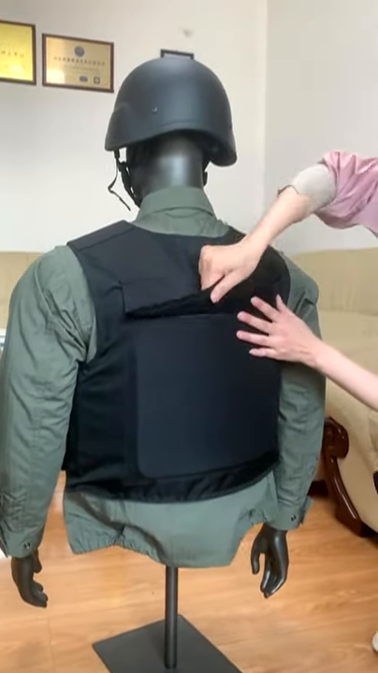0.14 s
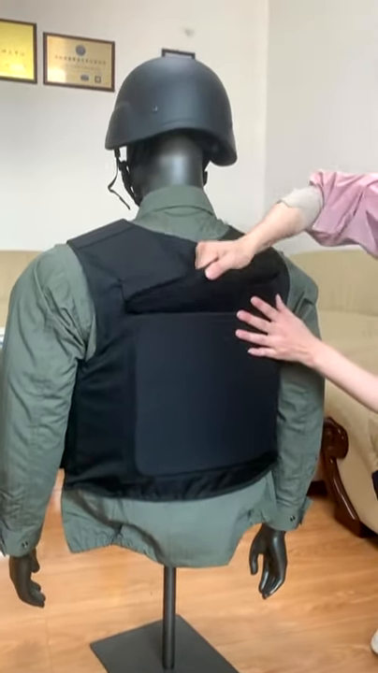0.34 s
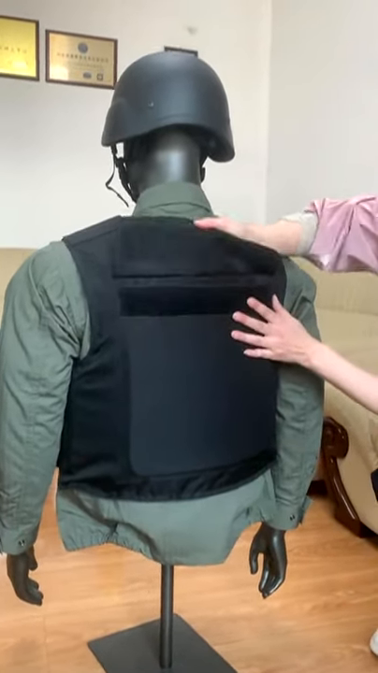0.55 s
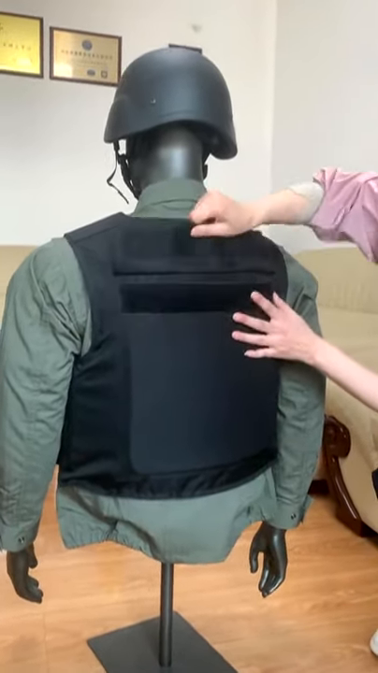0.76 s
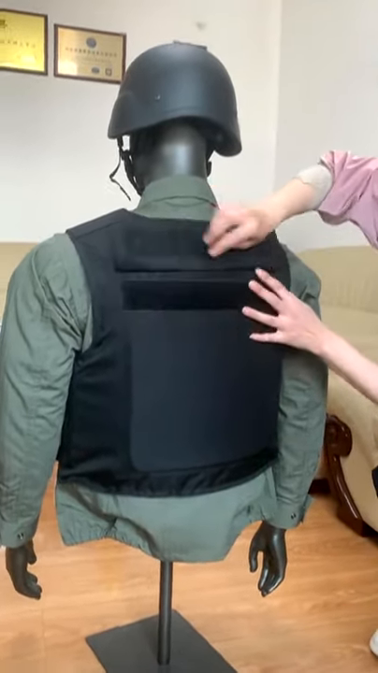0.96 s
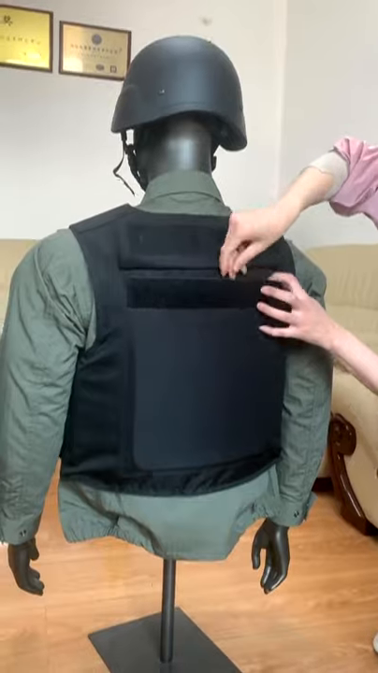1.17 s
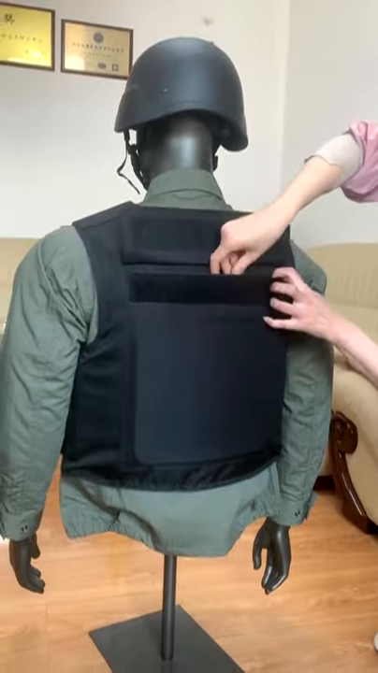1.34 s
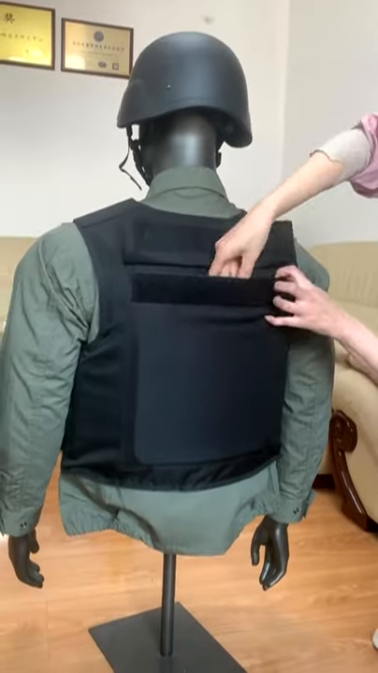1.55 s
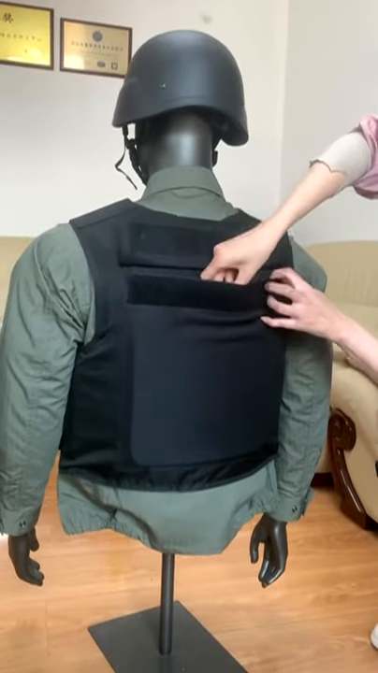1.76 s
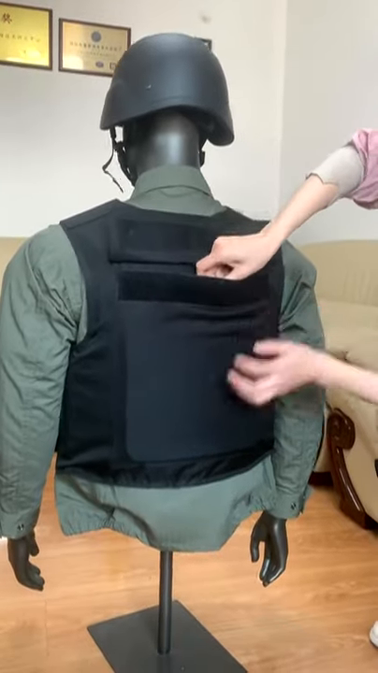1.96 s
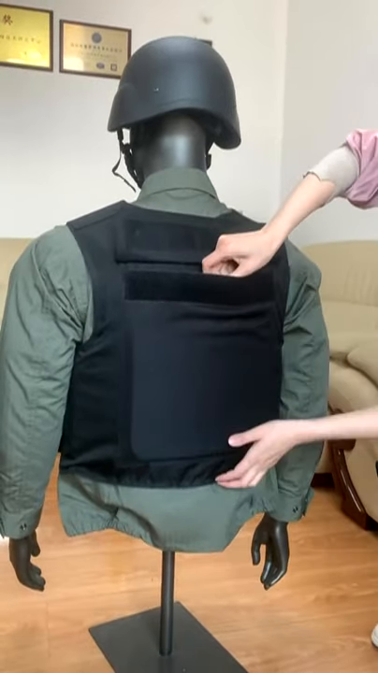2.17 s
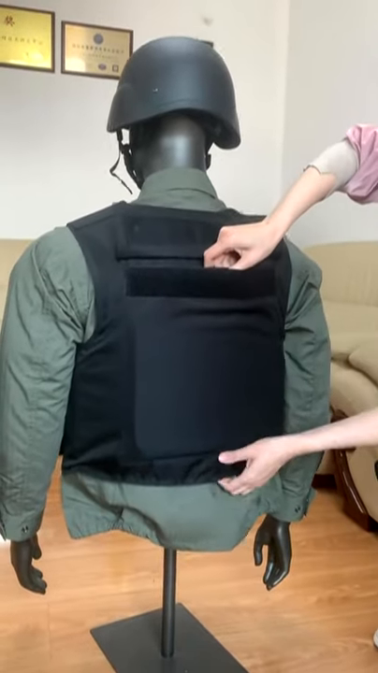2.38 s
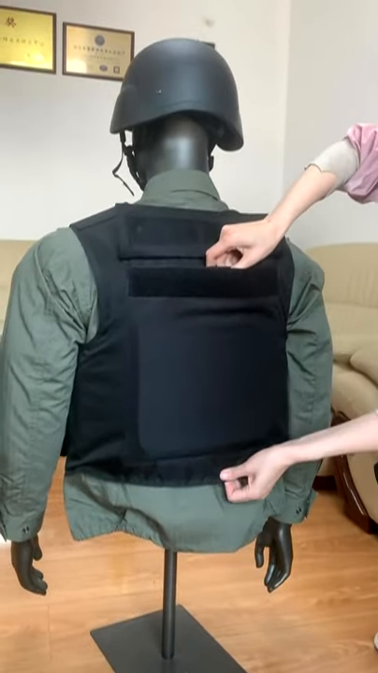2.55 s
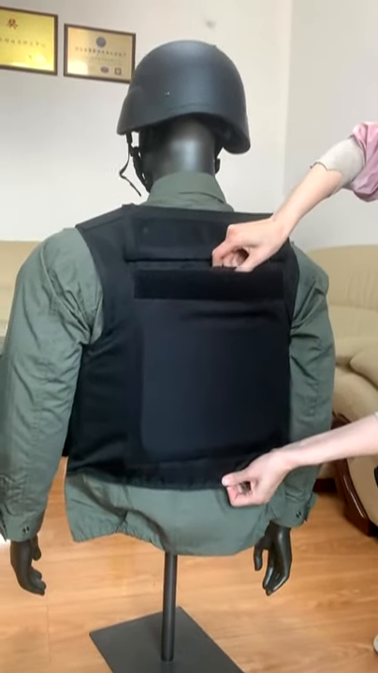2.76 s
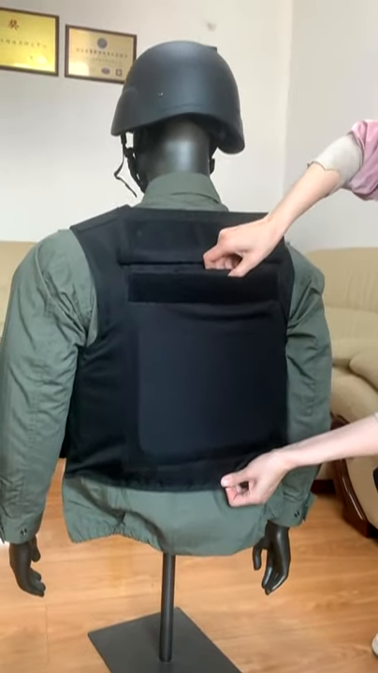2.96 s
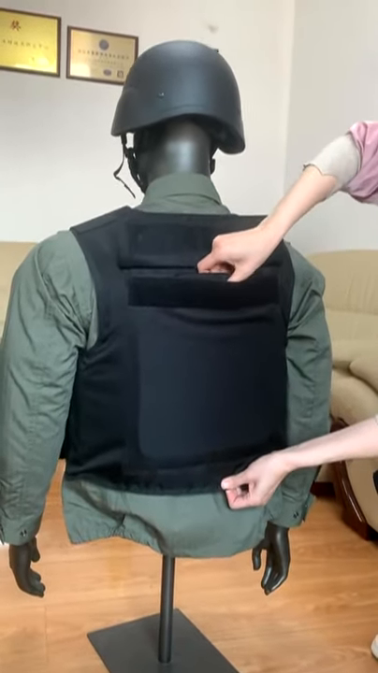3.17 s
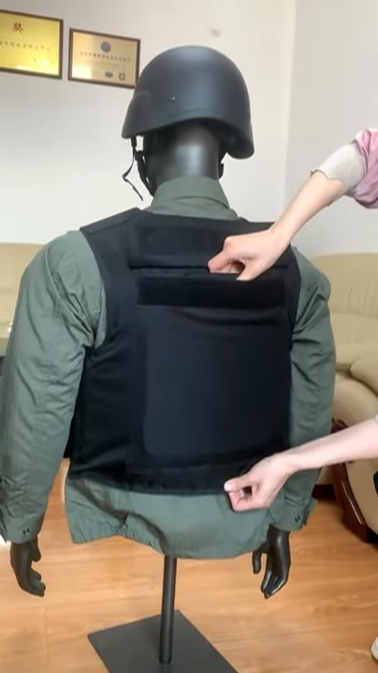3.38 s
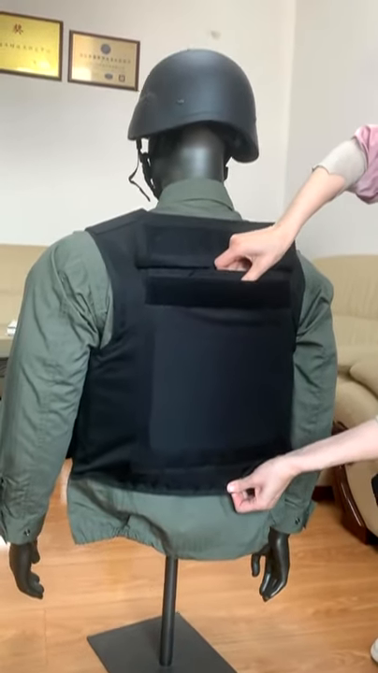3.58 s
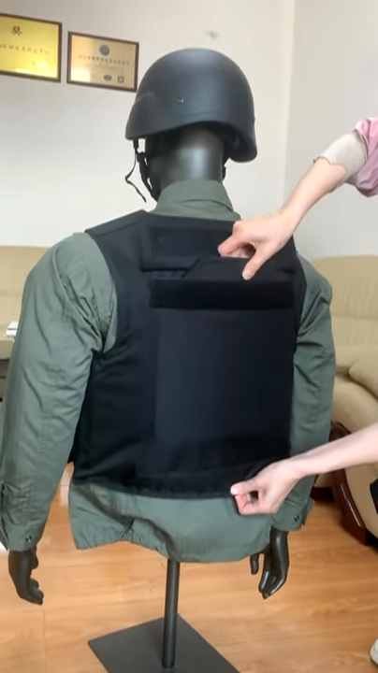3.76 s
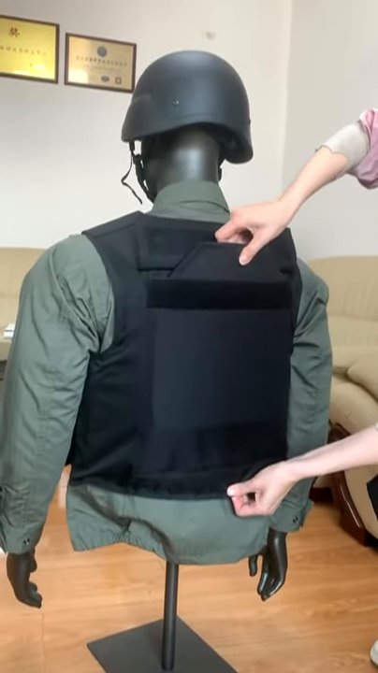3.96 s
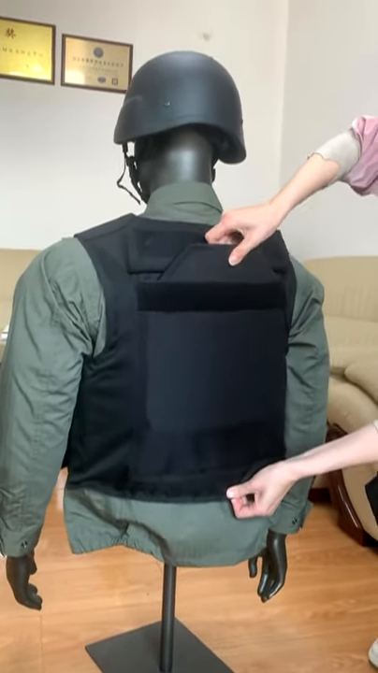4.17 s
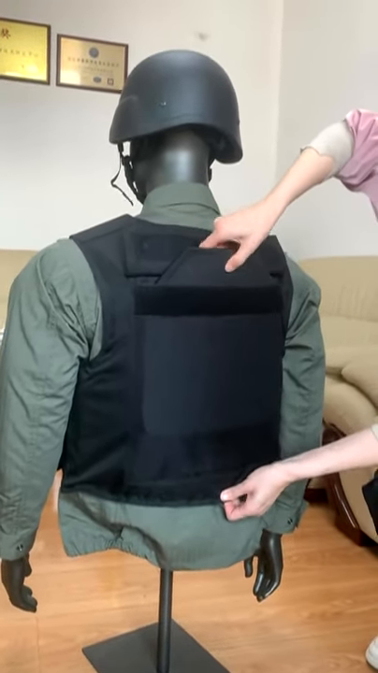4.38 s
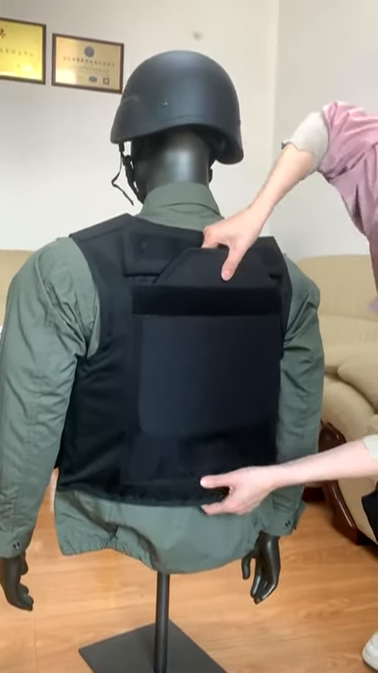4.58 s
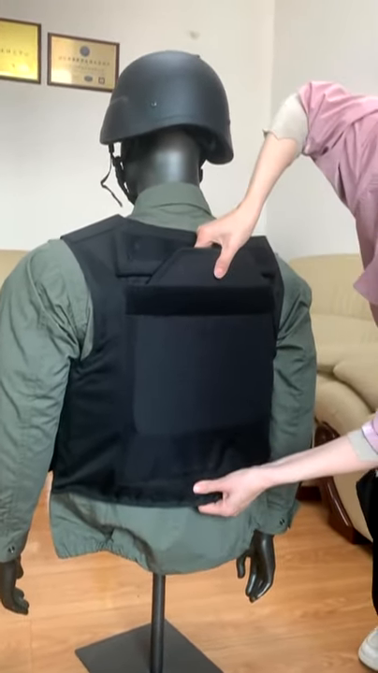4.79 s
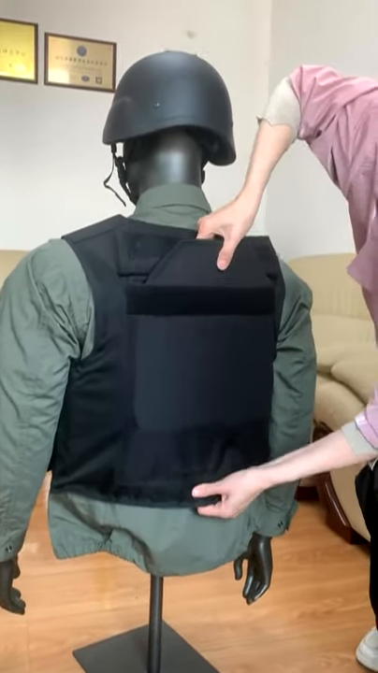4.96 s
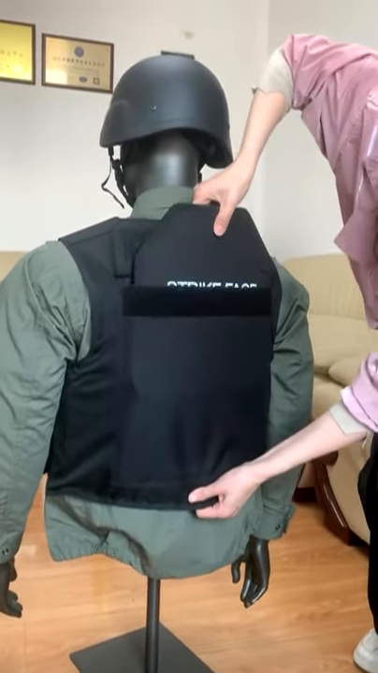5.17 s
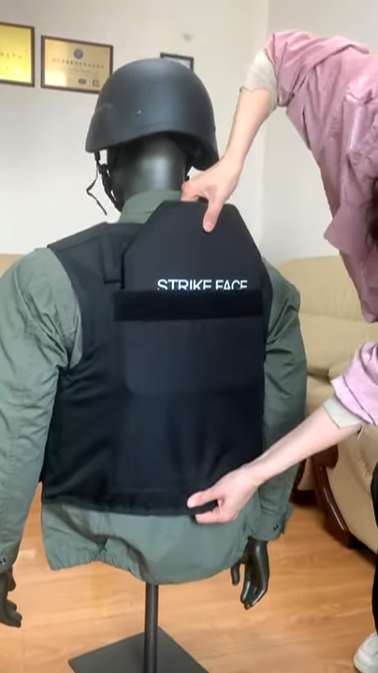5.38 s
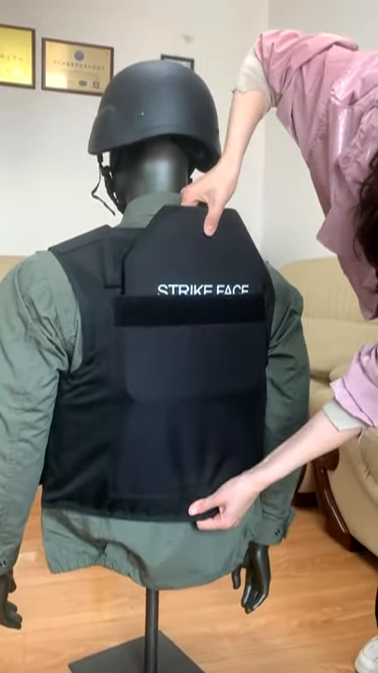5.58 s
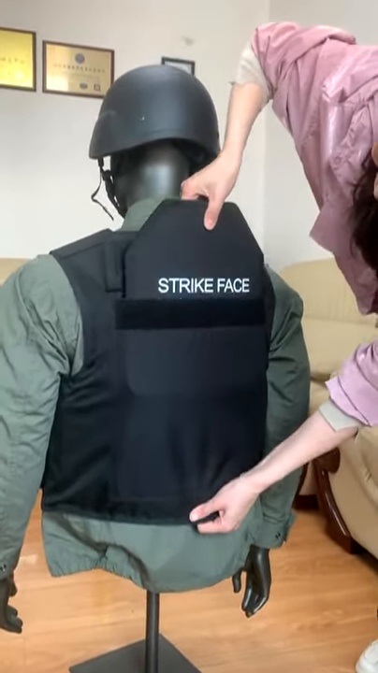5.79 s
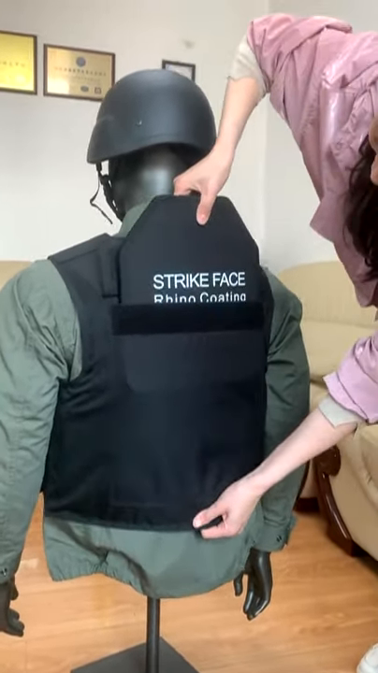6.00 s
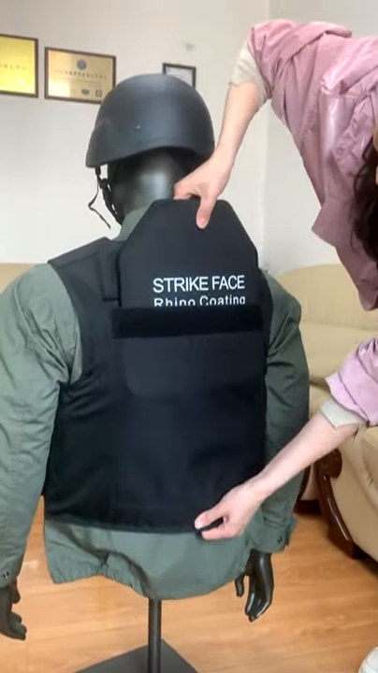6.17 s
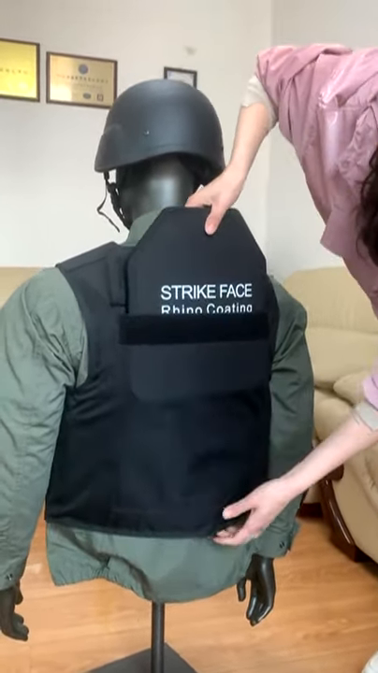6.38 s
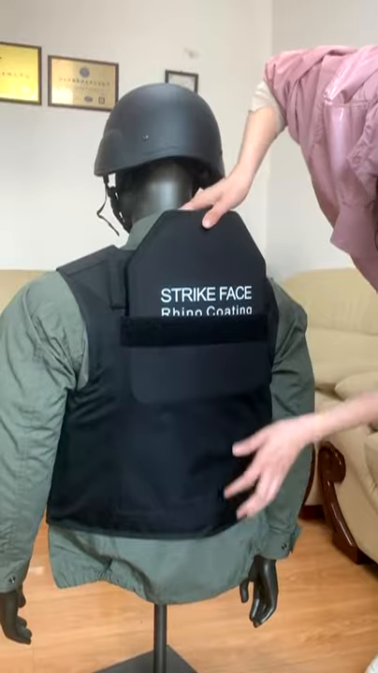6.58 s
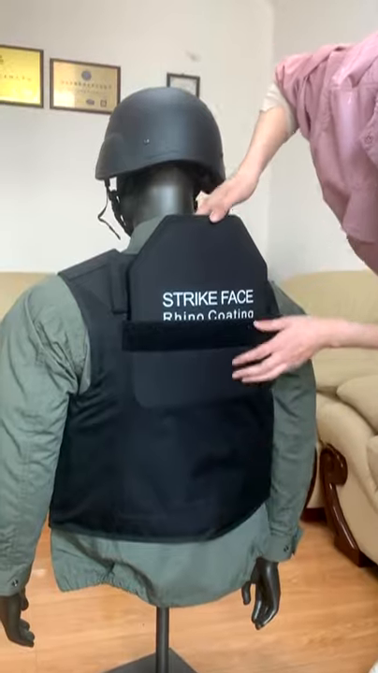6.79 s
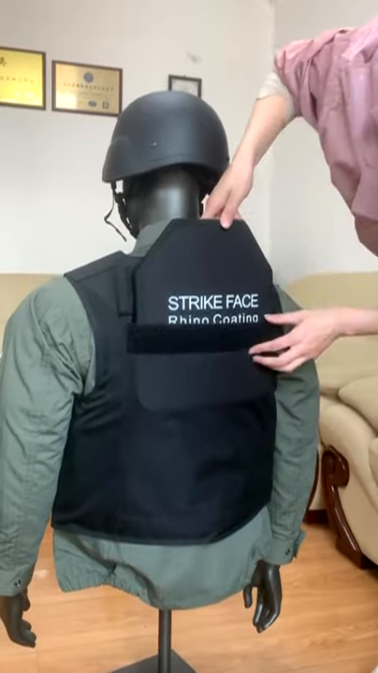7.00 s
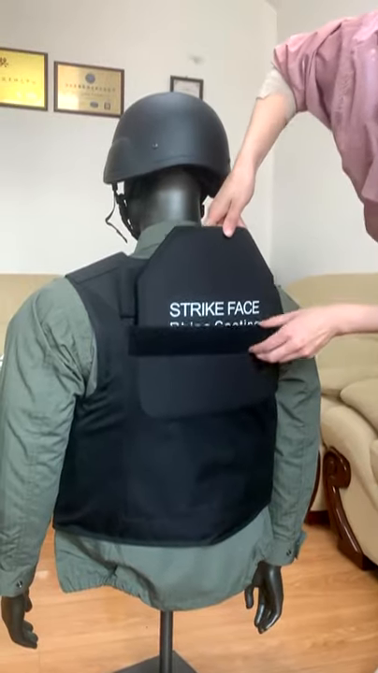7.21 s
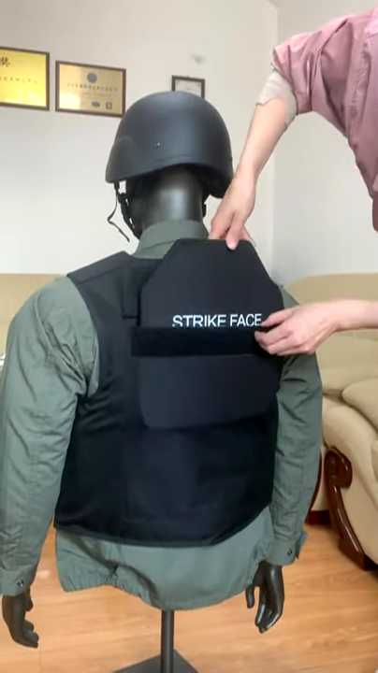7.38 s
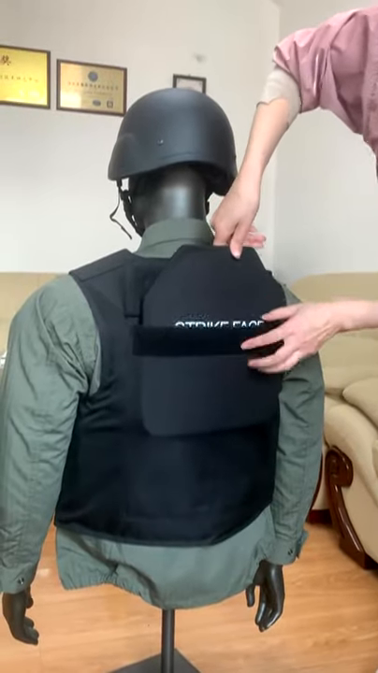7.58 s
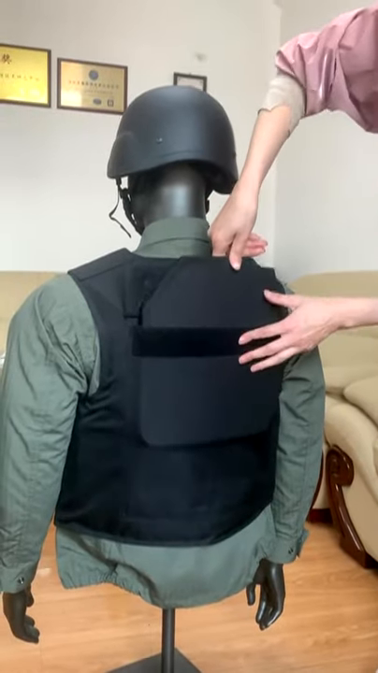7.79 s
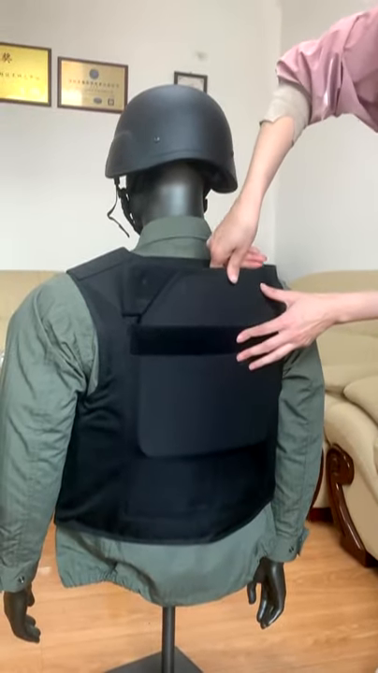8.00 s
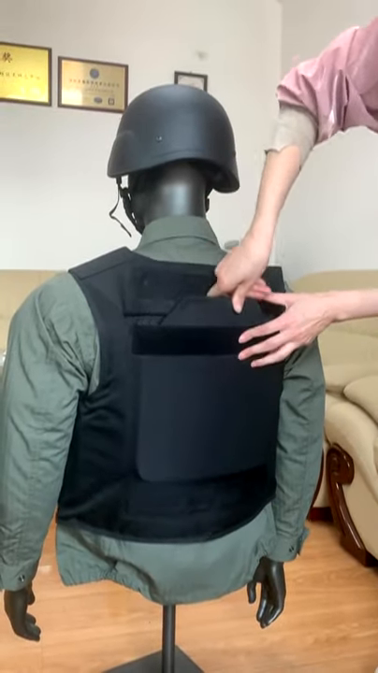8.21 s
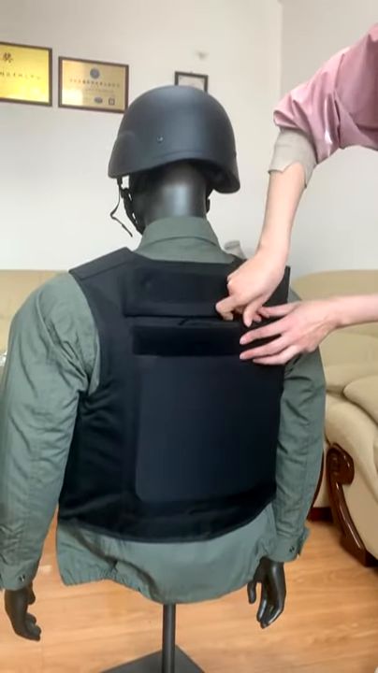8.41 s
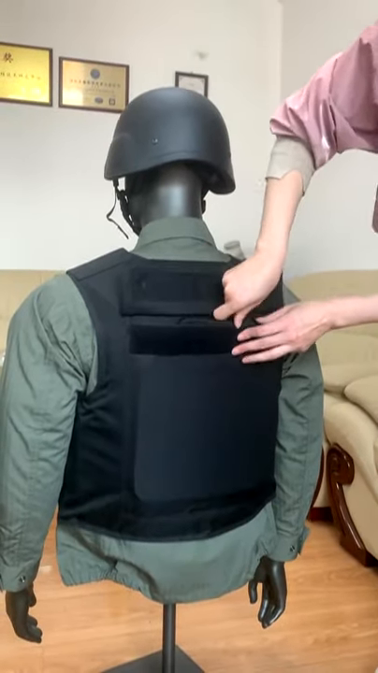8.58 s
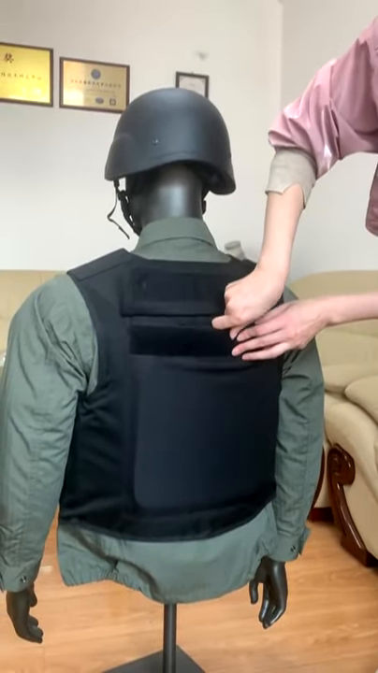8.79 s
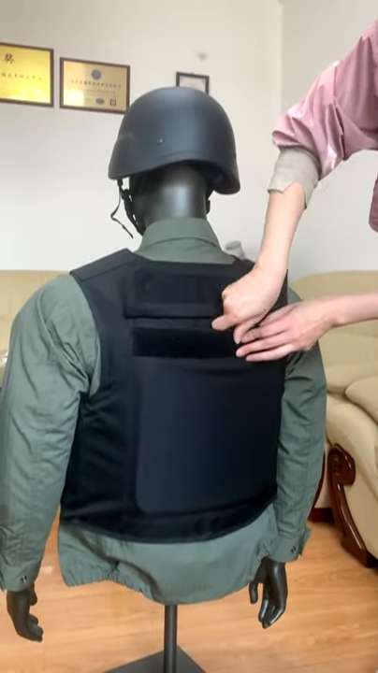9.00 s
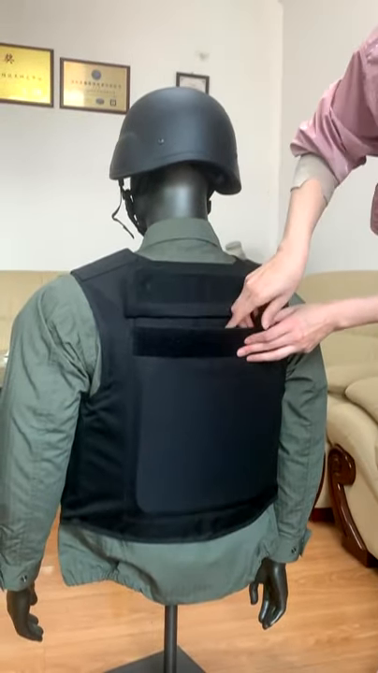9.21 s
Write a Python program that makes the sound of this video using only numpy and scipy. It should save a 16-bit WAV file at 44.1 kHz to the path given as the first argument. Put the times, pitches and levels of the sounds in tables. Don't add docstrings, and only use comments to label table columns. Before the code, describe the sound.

A hook-and-loop flap rips open with a harsh crackling tear, then a hard plate slides and rustles in a nylon pocket indoors.

```python
import sys
import numpy as np
from scipy import signal
from scipy.fft import rfft, irfft, next_fast_len
from scipy.io import wavfile
from scipy.ndimage import uniform_filter1d

SR = 44100
rng = np.random.default_rng(int(sys.argv[2]) if len(sys.argv) > 2 else 0)


def level_to_linear(level):
    exponent = np.asarray(level, float) / 20
    return 10 ** exponent


def waveform_to_disk(signal):
    frames = np.transpose(np.atleast_2d(signal))
    scaled = np.clip(frames, -1, 1) * 32767
    samples = np.round(scaled).astype(np.int16)
    wavfile.write(sys.argv[1], SR, samples)


N = 407925
TIME = np.arange(N) / SR
SIZE = next_fast_len(N + SR)
HZ = np.arange(SIZE // 2 + 1) * SR / SIZE + 1e-3

# time in seconds, level in dB.
TEAR_PULL = [
    (.29, -62),
    (.305, -40.5),
    (.395, -25),
    (.545, -30),
    (.56, -24),
    (.61, -29),
    (.66, -26.5),
    (.706, -26.5),
    (.722, -46.5),
]
# start in seconds, rise in dB, dying time in seconds.
HOOK_SURGES = [(0.307, 6, 0.0076), (.322, 7, 0.0062), (.331, 2, .006), (.344, 8, 0.005), (.358, 3.5, .006),
               (0.376, 5, 0.0067), (.402, 7.5, 0.01), (.413, 4.5, .01), (.432, 7.5, 0.014),
               (.466, 6, 0.024), (.506, 6.5, 0.016), (.552, 8.5, 0.045), (.574, 3.5, 0.022),
               (.632, 4.5, 0.028), (.662, 3.5, 0.028), (.698, 4, 0.0091)]
# time in seconds, level in dB.
FIRST_HOOKS = [(0.3047, -24), (0.3071, -20), (0.3077, -17), (0.3204, -17), (0.3234, -17), (0.3311, -15),
               (0.3389, -17), (0.3424, -15), (0.3814, -10), (0.403, -7), (0.4294, -8)]
# frequency in Hz, density in dB per Hz.
HOOK_SPECTRUM = [(150, -31), (400, -17.5), (600, -17), (1200, -4), (2200, -2.5), (3300, 0), (4200, 2.5),
                 (5000, 1), (9000, -3.5), (12000, -6.5)]
WEAVE_SPECTRUM = [(1200, -10), (2500, -5), (4000, -4.5), (6500, 0.5), (9000, -1), (12000, -4.5)]
FOLD_SPECTRUM = [(120, -7), (300, -2), (500, 0), (1000, -2.5), (1800, -3), (3000, -8.5), (5000, -17.5)]
# peak in seconds, weave hiss in dB, time to rise 20 dB in seconds, time to fall 20 dB in seconds,
# fold rustle in dB above the hiss.
FLAP_STROKES = [(.005, -57.5, 1, 0.8, 4.5), (.21, -42, 0.04, 0.02, -12), (.282, -58, .004, .03, 13),
                (.298, -47, .02, .02, -4), (.86, -52, 0.3, 0.11, 1), (.93, -55, .05, .05, 9),
                (1.0, -63, .1, .3, 9), (1.07, -35.5, .04, .014, -2.5), (1.27, -61.5, .02, 0.1, 11),
                (1.49, -60, 0.23, 0.1, -2), (1.68, -59.5, 0.1, 0.14, 5), (1.76, -67.5, 0.2, 0.65, 5.5),
                (2.03, -60.5, 0.1, 0.3, 2)]
PLATE_STROKES = [(2.31, -56, 0.28, .8, -7.5), (2.39, -60, 0.081, 0.63, 6), (2.98, -53, 0.41, 0.084, -11.5),
                 (3.57, -58, 0.12, .5, -23), (4.01, -42, 0.39, 0.16, -5), (5.09, -51, 0.12, 0.47, -9),
                 (5.35, -38.5, .24, 0.16, -1), (5.945, -51.5, .006, 0.24, -2.5),
                 (6.05, -42.5, 0.12, 0.1, -1.5), (7.47, -45.5, 0.198, .15, -5.5), (7.55, -52, .1, 0.46, 0),
                 (8.08, -48, .7, 0.39, -4), (8.46, -36.5, .3, .13, -5.5), (8.9, -50.5, .04, .25, -3),
                 (9.09, -51.5, .5, .06, -7), (5.2, -47.5, 0.21, 0.28, -10), (7.8, -57, .4, .3, -10)]
GRIP_STROKES = [(2.22, -68, .12, .1, 11), (2.66, -64, 0.36, .1, 6.5), (3.16, -72, 0.12, 0.089, 10),
                (3.26, -67.5, .15, 0.17, 4), (3.34, -57, .09, 0.096, 1.5), (4.3, -65, .08, .15, -3),
                (4.46, -60.5, 0.028, .14, 5.5), (4.65, -62, .18, .15, 6.5), (4.69, -66.5, 0.037, .1, 17),
                (4.74, -56.5, 0.094, 0.11, 4.5), (4.88, -65, .25, .4, 11), (5.55, -68, .1, 0.23, 10),
                (5.76, -72, .2, .15, 6.5), (6.15, -62.5, .05, 0.17, 6), (6.37, -65.5, .05, 0.35, 3.5),
                (6.49, -63, 0.21, 0.11, 4.5), (6.93, -64, .3, 0.11, 3.5), (7.05, -58.5, .09, .13, -8),
                (7.24, -61.5, 0.15, 0.53, 8.5), (8.6, -61, .1, .2, 4), (9.22, -69, .1, .3, -9)]
# time in seconds, pitch in Hz, level in dB.
POCKET_TONES = [
    [(.68, 91.5, -57), (.73, 79.6, -43.5), (.8, 75, -62)],
    [(3.97, 165, -71), (4.02, 151, -51), (4.07, 135, -66)],
    [(5.2, 95, -61), (5.27, 100.8, -52), (5.36, 109, -58)],
    [(6.0, 139.6, -57), (6.07, 159, -47), (6.15, 166, -61)],
    [(8.28, 69.7, -55), (8.33, 85.2, -52), (8.38, 161.5, -61), (8.43, 231.6, -47), (8.5, 241, -50),
     (8.57, 216.5, -55.5), (8.65, 180, -68)],
]
# time in seconds, peak in dB, pitch in Hz.
DULL_KNOCKS = [(0.019, -39.5, 764), (0.28, -34, 380), (0.699, -18, 915), (0.922, -32, 1117),
               (0.937, -38, 215), (1.061, -33, 385), (1.258, -36, 413), (1.266, -49, 460),
               (1.689, -48, 374), (1.824, -49, 444), (2.229, -46, 940), (2.649, -47, 665),
               (3.145, -41.5, 366), (4.456, -40, 363), (7.142, -48, 667), (7.248, -45, 323),
               (7.427, -45, 560), (8.592, -41, 800), (8.763, -49, 773), (8.899, -40.5, 721),
               (9.011, -42.5, 660)]
# time in seconds, peak in dB.
PLATE_HITS = [
    (4.6785, -24.5),
]
# frequency in Hz, level in dB, decay by 60 dB in seconds.
PLATE_MODES = [(234, 1, 0.068), (619, 5, 0.074), (860, -10.5, 0.036), (1190, -8, 0.065), (1873, -9, 0.033)]
# time in seconds, peak in dB, pitch in Hz.
FABRIC_SNAPS = [(0.1955, -34, 2650), (0.21, -35, 8970), (0.282, -28, 1230), (1.0654, -23, 1890),
                (2.3744, -41, 2030), (3.342, -42, 8600), (4.4555, -34.5, 6500), (4.7294, -46, 2090),
                (4.736, -46, 1630), (5.9399, -41, 1710), (7.427, -38, 2030), (7.7794, -42, 7780),
                (8.763, -43, 1600), (8.8997, -40, 7460), (8.9705, -35, 1910), (9.0643, -34.5, 2200),
                (9.223, -51, 2050), (0.925, -33, 1140), (1.258, -35, 740)]
# frequency in Hz, decay by 60 dB in seconds.
ROOM_DECAY = [(100, .6), (500, 0.78), (2000, 0.67), (4000, 0.64), (7000, 0.39), (11000, 0.54)]
# frequency in Hz, density in dB per Hz.
BUILDING_SPECTRUM = [(25, -11.5), (50, -0.5), (75, 2), (110, -4.5), (200, -10), (400, -14.5), (700, -19.5),
                     (1500, -18.5), (3000, -26), (6000, -24), (12000, -44)]
# frequency in Hz, width in Hz, level in dB, share of the swell.
MOTOR_TONES = [
    (75.9, 5.1, -68.5, 0),
    (369.6, 2.8, -75, 1),
]
# middle in seconds, half length in seconds, rise in dB.
MOTOR_SWELLS = [(.6, 0.86, 6.5), (1.5, .3, 8.5), (3.1, 0.43, 6), (6.8, 0.42, 11.5)]
# frequency in Hz, lead of the left port in half turns.
PORT_PHASE = [(0, 0), (2100, 0), (2700, .5), (4200, .6), (4900, 1), (5900, 1), (6300, 1.4), (7100, 2),
              (9800, 2), (11100, 3), (13000, 3)]
# frequency in Hz, level in dB.
PORT_DIFFERENCE = [(40, -27), (130, -15.5), (500, -6), (1000, -5.5), (1600, -11), (2300, -3), (4200, -8.5),
                   (4900, -27), (5800, -18), (6300, -6.5), (7200, -34.5), (9500, -33), (10300, -19),
                   (11300, -34.5)]
# time in seconds, lead of the left port and equal delay of
# the right in seconds.
EXTRA_LAG = [(0, -4e-6), (2.15, -3e-6), (2.35, 18e-6), (3.05, 17e-6), (3.3, -3e-6), (3.6, 20e-6),
             (3.82, 20e-6), (3.95, -3e-6), (9.25, -4e-6)]
# frequency in Hz, share of the lag that is felt.
SWAY_BAND = [(2500, 0), (3700, 1), (4400, 1), (4900, .4), (6000, .4), (6600, 0)]

HOOKS_PER_S, SPARSER_PER_DB = 6000, .6
RISE_BEND, FALL_BEND = 1.063, 1.29
REST_HISS_DB, REST_RUSTLE_DB = -90, -74
KNOCK_T60_S, SNAP_S = .028, .0025
PORT_SWAY_S, SWAYS_PER_S = 7e-6, 10
TOP_HZ = 11750
HEADROOM = .7


def rms_one(x):
    return x / np.sqrt(np.mean(x ** 2) + 1e-20)


def at_hz(points):
    hz, value = np.transpose(points)
    return np.interp(np.log(HZ), np.log(hz), value)


def coloured(x, spectrum):
    closed = [(spectrum[0][0] / 2, -60)] + list(spectrum) + [(20000, -60)]
    return rms_one(irfft(rfft(x, SIZE) * level_to_linear(at_hz(closed)), SIZE)[..., :N])


def played(tables, column):
    out = np.full(N, -150.)
    for rows in tables:
        rows = np.array(rows)
        inside = (TIME >= rows[0, 0]) & (TIME <= rows[-1, 0])
        out[inside] = np.interp(TIME[inside], rows[:, 0], rows[:, column])
    return out


def drift(rate):
    r = np.exp(-32 * np.pi * rate / SR)
    white = rng.standard_normal(N // 16 + 3002)
    slow = rms_one(signal.lfilter([1], [1, -2 * r, r * r], white)[3000:])
    return np.interp(np.arange(N) / 16, np.arange(len(slow)), slow)


def grains(per_s, spread_db):
    sizes = level_to_linear(spread_db * np.minimum(rng.exponential(1, N), 4))
    signs = rng.choice([-1, 1], N)
    return sizes * signs * (rng.random(N) < per_s / SR)


def ring(x, hz, t60):
    r, w = level_to_linear(-60 / (t60 * SR)), 2 * np.pi * hz / SR
    return signal.lfilter([0, np.sin(w)], [1, -2 * r * np.cos(w), r * r], x)


def add(out, s, piece):
    at = int(s * SR)
    out[at:at + len(piece)] += piece[:N - at]


def tear():
    lift_db = np.zeros(N)
    after = np.arange(SR // 5) / SR
    for s, db, dying in HOOK_SURGES:
        add(lift_db, s, db * np.exp(-after / dying) * (1 - np.exp(-after / .001)))
    pull_db = played([TEAR_PULL], 1)
    density = level_to_linear(SPARSER_PER_DB * np.clip(pull_db + 26, -30, 0))
    clicks = grains(HOOKS_PER_S * density, spread_db=3.6) / np.sqrt(density)
    hooks = coloured(clicks, HOOK_SPECTRUM)
    tape = rms_one(ring(grains(1500, spread_db=4.0), 3340, 0.0042)) * level_to_linear(-8 + 3.3 * drift(40))
    dense = level_to_linear(pull_db + lift_db + 1.2 * drift(120) + 3.0) * (hooks + tape)

    first = np.zeros(N)
    s, db = np.transpose(FIRST_HOOKS)
    first[(s * SR).astype(int) + 8] = level_to_linear(db) * (-1) ** np.arange(len(s))
    first = coloured(first, HOOK_SPECTRUM)
    return dense + first * level_to_linear(db.max() + 3.0) / np.abs(first).max()


def strokes():
    rows = np.transpose(FLAP_STROKES + PLATE_STROKES + GRIP_STROKES)
    s, db, rise_s, fall_s, folds_db = rows[..., None]
    t = TIME[::64]
    before, after = np.maximum(s - t, 0) / rise_s, np.maximum(t - s, 0) / fall_s
    gain = level_to_linear(db - 20 * before ** RISE_BEND - 20 * after ** FALL_BEND)
    hiss = np.sqrt(level_to_linear(2 * REST_HISS_DB) + np.sum(gain ** 2, axis=0))
    rustle = np.sqrt(level_to_linear(2 * REST_RUSTLE_DB) + np.sum((gain * level_to_linear(folds_db)) ** 2, axis=0))
    return np.interp(TIME, t, hiss), np.interp(TIME, t, rustle)


def rub():
    hiss_gain, rustle_gain = strokes()
    grip = drift(26)
    hiss = coloured(grains(12000, spread_db=1.0), WEAVE_SPECTRUM)
    hiss = hiss * hiss_gain * level_to_linear(0.8 * grip + 1.1 * drift(150) + 2.3)
    rustle = coloured(grains(2500, spread_db=1.5), FOLD_SPECTRUM)
    rustle = rustle * rustle_gain * level_to_linear(1.06 * grip + 1.24 * drift(55) - 0.4)
    return hiss + rustle


def pocket_air():
    hz = np.maximum(played(POCKET_TONES, 1), 0) * (1 + 0.09 * drift(35))
    gain = uniform_filter1d(level_to_linear(played(POCKET_TONES, 2)), size=800)
    gain = gain * level_to_linear(4.95 * drift(30) - 1.5)
    return gain * np.sin(2 * np.pi * np.cumsum(hz) / SR) * np.sqrt(2)


def knocks():
    out, after = np.zeros(N), np.arange(SR // 8) / SR
    for s, db, hz in DULL_KNOCKS:
        push = rng.standard_normal(len(after)) * np.exp(-after / 0.003)
        body = ring(push, hz, KNOCK_T60_S)
        body = body + 0.68 * ring(push, hz * 1.9, KNOCK_T60_S)
        body = body + 0.34 * ring(push, hz * .55, KNOCK_T60_S)
        add(out, s, level_to_linear(db - 2.0) * body / np.abs(body).max())
    for s, db in PLATE_HITS:
        push = np.exp(-((after - .001) / 0.00028) ** 2)
        body = sum(level_to_linear(level_db) * ring(push, hz, t60 * 0.41) for hz, level_db, t60 in PLATE_MODES)
        add(out, s, level_to_linear(db) * body / np.abs(body).max())
    return out


def snaps():
    out, after = np.zeros(N), np.arange(SR // 16) / SR
    for s, db, hz in FABRIC_SNAPS:
        burst = rng.standard_normal(len(after)) * np.exp(-after / SNAP_S)
        crack = burst + .45 * ring(burst, hz, 8.0 / hz)
        add(out, s, level_to_linear(db + 1.0) * crack / np.abs(crack).max())
    return out


def room(x):
    after = np.arange(SR) / SR
    white, tail = rng.standard_normal((2, SR)), 0
    decay_hz, decay_s = np.transpose(ROOM_DECAY)
    for low in 45 * 2. ** np.arange(8):
        t60 = np.interp(np.log(low * np.sqrt(2)), np.log(decay_hz), decay_s)
        octave = signal.butter(2, [low, 2 * low], "band", fs=SR, output="sos")
        tail = tail + signal.sosfilt(octave, white) * level_to_linear(-60 * after / t60)
    tail = tail * (1 - np.exp(-(after / 0.0045) ** 2))
    return irfft(rfft(x, SIZE) * rfft(rms_one(tail) / np.sqrt(SR), SIZE), SIZE)[:, :N]


def background():
    out = level_to_linear(-61 + 0.6 * drift(2)) * coloured(rng.standard_normal((2, N)), BUILDING_SPECTRUM)
    swell_db = -4 + sum(db * np.exp(-((TIME - s) / half_s) ** 4) for s, half_s, db in MOTOR_SWELLS)
    for hz, width_hz, db, share in MOTOR_TONES:
        tone = rms_one(ring(rng.standard_normal(N), hz, 2.25 / width_hz))
        out[0] += level_to_linear(db + share * swell_db) * tone
    return out


def scene():
    flap = tear()
    handling = rub() + pocket_air() + knocks() + snaps()
    direct = flap + handling
    echoes = room(flap * level_to_linear(-1.5) + handling * level_to_linear(-2.5)) * level_to_linear([[-11], [-8]])
    early = np.roll(direct, 97) * level_to_linear(-3)
    return direct * [[1], [0]] + early * [[0], [1]] + echoes + background()


def low_pass(x):
    return signal.sosfilt(signal.butter(12, 12300, fs=SR, output="sos"), x)


def record(dry):
    rounded = HEADROOM * np.tanh(dry / HEADROOM)
    shared, unlike = rfft(rounded, SIZE) * (HZ < TOP_HZ)
    turn = np.exp(.5j * np.pi * np.interp(HZ, *np.transpose(PORT_PHASE)))
    unlike = unlike * level_to_linear(at_hz(PORT_DIFFERENCE))
    ports = np.array([(shared + unlike) * turn, (shared - unlike) / turn]) * level_to_linear(0.6)
    slopes = irfft(ports * 2j * np.pi * HZ * at_hz(SWAY_BAND), SIZE)[:, :N] * [[1], [-1]]
    lag = played([EXTRA_LAG], 1) + PORT_SWAY_S * drift(SWAYS_PER_S)
    mix = irfft(ports, SIZE)[:, :N] + lag * slopes
    return low_pass(mix)


dry = scene()
out = record(dry)
waveform_to_disk(out)
```